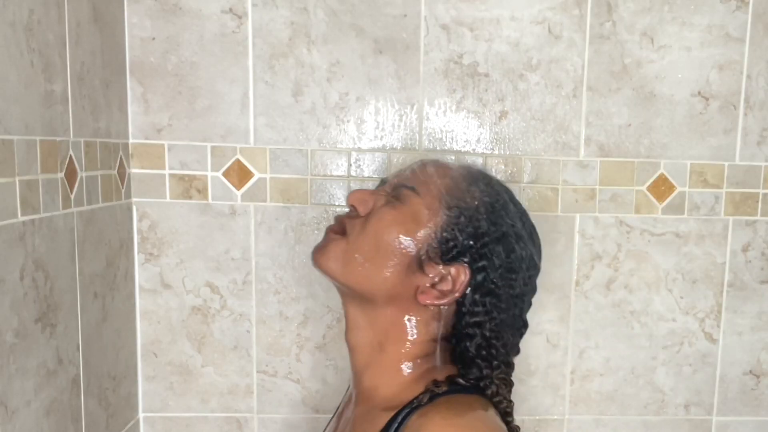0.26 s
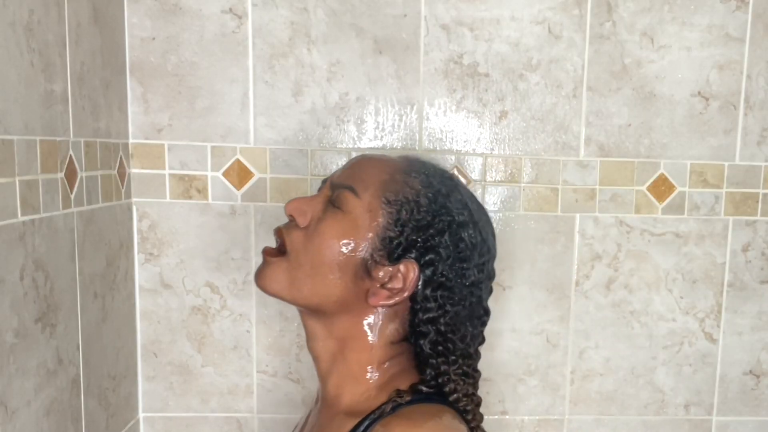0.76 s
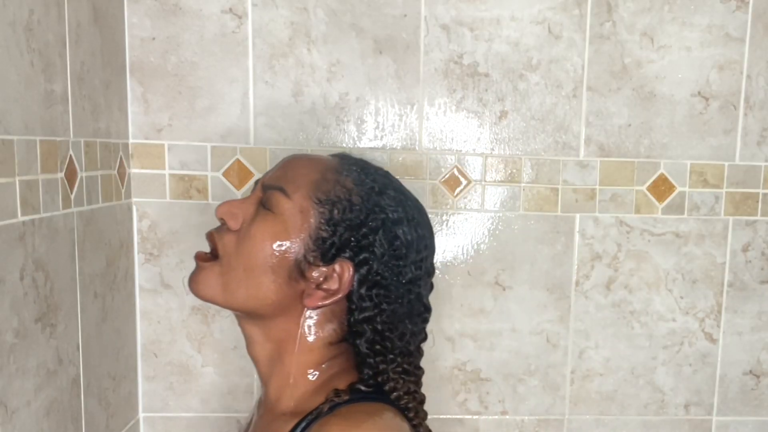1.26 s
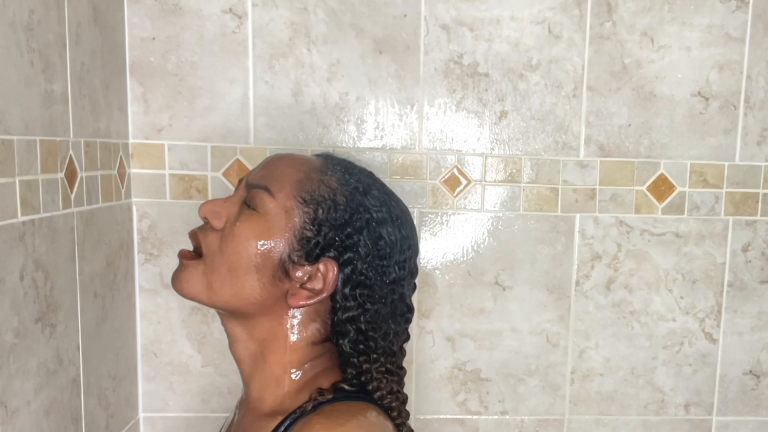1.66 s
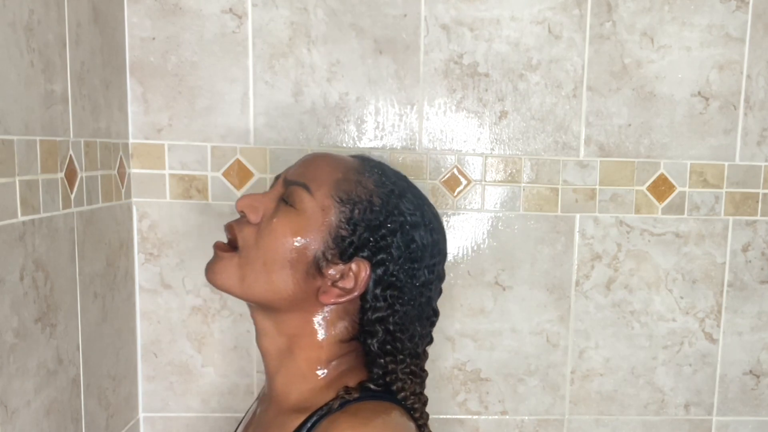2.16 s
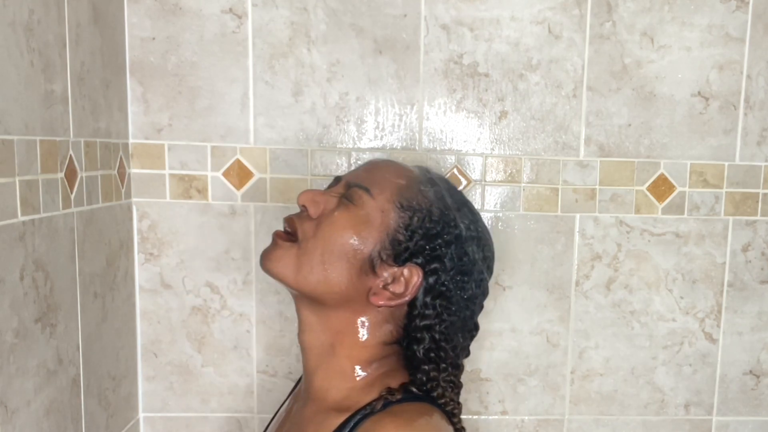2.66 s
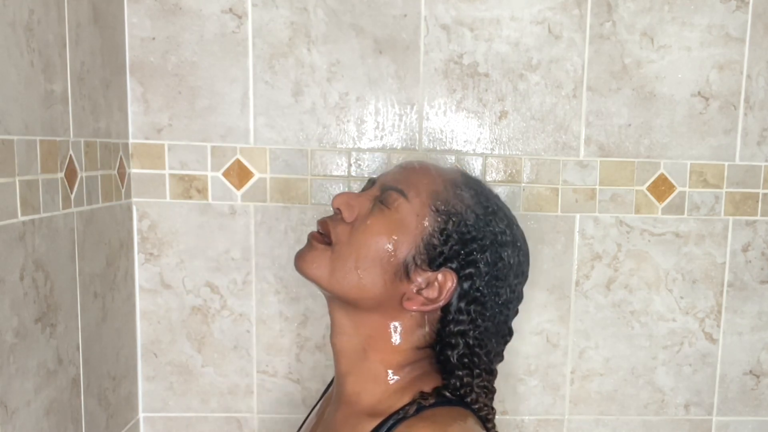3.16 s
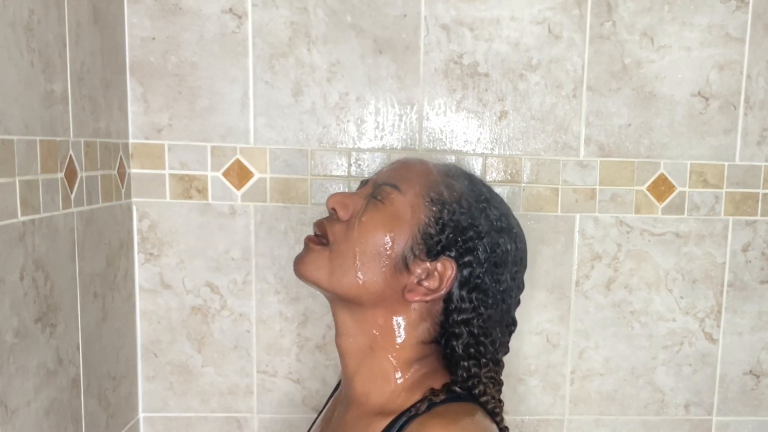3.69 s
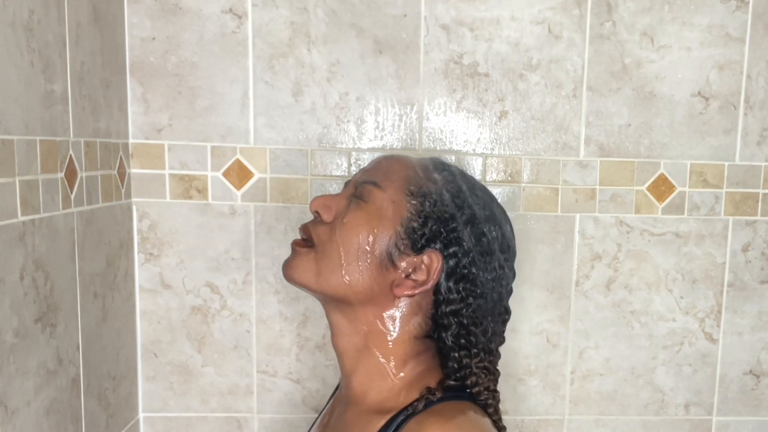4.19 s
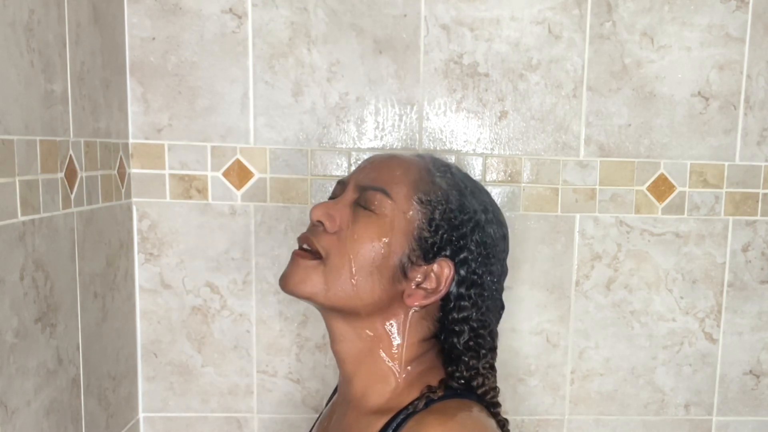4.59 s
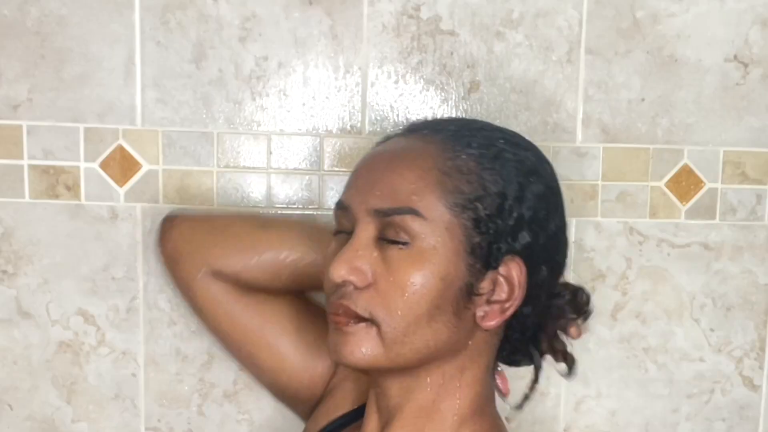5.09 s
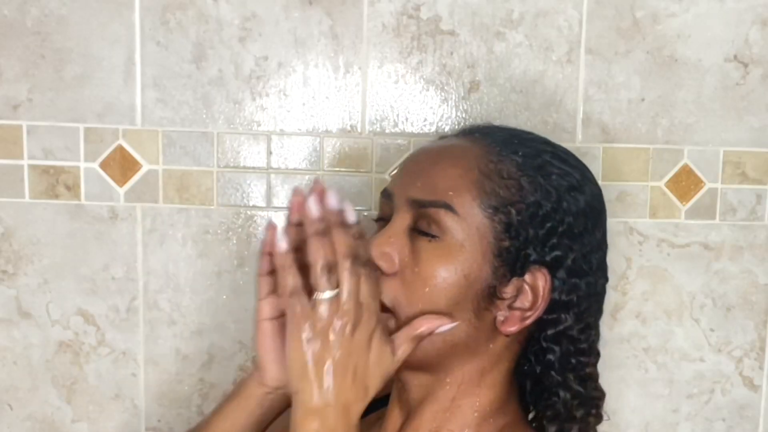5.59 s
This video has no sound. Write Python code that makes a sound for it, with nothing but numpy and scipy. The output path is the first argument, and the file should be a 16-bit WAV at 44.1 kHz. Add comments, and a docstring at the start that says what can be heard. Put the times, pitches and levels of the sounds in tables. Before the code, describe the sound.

A shower is already running at full flow, drumming on wet hair and skin in a small tiled stall. The sound is a dense stereo spray: low thumping, midrange patter and fine bright spatter, with short reflections from the tiles. A sharp splat cracks at 0.4 s, and heavier gushes pour off the hair around 0.65-1.5 s. Hollow glugs, small gurgles and ticking droplets continue, with bright slaps of water notably near 1.8, 2.3 and 4.4 s. The spray is fullest around 2-2.5 s, then eases back by 3.5 s. A faint, wavering, airy whistle comes from the nozzle. Two tiny bubbles chirp near 4.3 s. At about 5.1 s the water stops abruptly. Much quieter, wet palms rub over the face and hair in short strokes until the end near 6 s, with squelches and soft hollow pats around 5.2, 5.3, 5.55 and 5.7 s. A faint low hum and dull rumble remain throughout.

```python
"""A shower drums at once on a person's head in a tiled stall: surging noise bands made of random drops. Plops
gurgle and tick off the hair, glugs ring low, and lumps slap the floor as bright clicks with echo. The nozzle
sings faintly over it in narrow bands of noise. The scene changes abruptly from the spray to wet palms wiping
hair and face in strokes of drop noise, with soft pats. A low sine hum and a dull rumble lie under everything."""
import sys
import numpy as np
from scipy import signal
from scipy.fft import rfft, irfft, next_fast_len
from scipy.io import wavfile

SR = 44100
rng = np.random.default_rng(int(sys.argv[2]) if len(sys.argv) > 2 else 0)


def pcm_store(signal):
    """Save signal as 16-bit PCM."""
    levels = np.round(np.clip(np.atleast_2d(signal), -1, 1) * 32767)
    wavfile.write(sys.argv[1], SR, levels.astype(np.int16).T)


N = 257528
T = np.arange(N) / SR  # s
SIZE = next_fast_len(N, True)
HZ = np.fft.rfftfreq(SIZE, 1 / SR)

# the spray ends at STOP_S after a fade of FADE_S
STOP_S, FADE_S = 5.094, 0.044

# colours of the spray, from deep thumping to fine spatter: (frequency [Hz], level per Hz [dB])
DEEP_COLOUR = [(20, -18), (45, -14), (70, 0), (88, -4.5), (110, -10), (138, 9.5), (175, -13), (400, -51)]
DRUM_COLOUR = [(20, -32), (45, -21), (70, -14), (88, -25), (135, -4.5), (175, -5), (230, 0), (290, -11.5),
               (480, -8), (700, -12.5), (1500, -61.5)]
PATTER_COLOUR = [(200, -23), (480, -8), (680, -3.5), (1050, 1.5), (1500, -2.5), (2050, -2), (2600, -10),
                 (3500, -19), (6000, -15)]
SPATTER_COLOUR = [(1500, -36), (3000, -9.5), (4500, -8), (6500, -4), (8600, -3.5), (10000, -5.5),
                  (12000, -2), (14000, -2.5), (15700, -2.5)]
# how squarely the jet meets the head, which leans in and out again: (time [s], level [dB])
CONTACT = [(0, -5), (.7, -5), (1.25, -3), (1.9, -0.5), (2.5, -0.5), (3.1, -2), (3.5, -4.5), (4.08, -4.5),
           (4.3, -3.5), (5.05, -5)]
# water gathered in the hair pours off in heavy gushes: (middle [s], length [s], swell [dB])
GUSHES = [(0.02, 0.098, 3.5), (.21, 0.14, 1.5), (.42, 0.32, 2.5), (.65, 0.25, 7), (0.8, 0.27, 10),
          (1.03, 0.34, 4.5), (1.3, 0.36, 5.5), (1.525, 0.24, 4.5), (1.82, 0.17, 1.5), (2.19, 0.15, 3),
          (2.45, 0.27, 3), (2.82, 0.14, 1.5), (3.03, 0.39, 4.5), (4.4, 0.2, 2.5), (4.74, 0.2, -2)]
# the spatter swells in bright swishes: (middle [s], length [s], swell [dB])
SWISHES = [(.195, 0.2, 5), (1.36, 0.14, 2), (1.62, 0.3, 2), (1.74, 0.071, 1.5), (1.98, 0.058, 1)]
# each layer of the spray: (level at full contact [dB], gain per dB of contact [dB])
DRUMMING, THUMPING, PATTERING, SPATTERING = (-41.5, 0.81), (-48.5, 1.28), (-40, 0.49), (-36.5, 1.19)
THUMP_SWELL = 1.7  # dB of deep thumping gained per dB of a gush

# each layer of the run-off: (level at full contact [dB], gain per dB of contact [dB])
GURGLING, TICKING = (-48, 0.71), (-50, 0.5)
# hollow glugs: (start [s], length [s], peak level [dB], pitch [Hz])
GLUGS = [(0.005, 0.07, -40, 336), (0.785, 0.072, -38, 129.6), (0.792, 0.035, -36, 195),
         (1.48, 0.12, -33, 134.3), (1.505, 0.06, -40, 208), (1.82, 0.066, -42, 243),
         (2.395, 0.098, -36, 139), (2.465, 0.078, -37, 326), (2.505, 0.05, -44, 210),
         (3.055, 0.084, -43, 130), (4.29, 0.09, -45, 138), (4.535, 0.1, -41.5, 137), (4.7, 0.13, -42, 136)]
PLOP_RISE = 0.06  # share by which a plop starts below its pitch and ends above it

# lumps of water slapping down:
# (time [s], level [dB], centre [Hz], half-width [octaves], echo against the slap [dB])
SLAPS = [(0.4028, -11, 7160, 0.32, 0), (0.4053, -21.5, 3790, 0.2, 3), (0.409, -29, 2880, 0.16, 5),
         (0.419, -22.5, 5630, 0.27, 8.5), (0.786, -24, 9200, 0.4, 7), (0.8866, -18.5, 9600, 0.48, 8),
         (1.026, -20.5, 8300, .22, 8), (1.213, -29, 8400, 0.29, 10), (1.525, -21, 9600, 0.32, 5),
         (1.5854, -29, 8330, .3, 5), (1.8157, -15.5, 7300, 0.53, 8), (1.822, -20, 8000, .35, 6),
         (1.911, -28, 8000, .25, -3), (2.013, -19, 9300, 0.35, 8), (2.166, -29, 8200, .25, 9),
         (2.2905, -16.5, 8900, 0.41, 8), (2.441, -25, 9000, 0.3, 11), (2.538, -20, 7000, 0.52, 1),
         (2.595, -18.5, 8400, 0.35, 6), (2.648, -19.5, 7600, .3, 0), (2.831, -25, 9400, 0.16, 1),
         (3.1254, -24.5, 5630, 0.26, 4), (3.138, -33, 4680, 0.26, -1), (3.144, -31.5, 3080, .22, 5.5),
         (3.2282, -29, 8400, 0.27, 10), (3.383, -19, 9400, 0.36, 0), (3.769, -20.5, 8100, 0.32, 10),
         (3.782, -25, 8600, 0.44, 8), (4.152, -28.5, 8500, .3, 2), (4.401, -25, 8100, .2, 1),
         (4.408, -17.5, 10100, 0.54, 8.5), (4.529, -27.5, 8600, 0.3, 10), (4.747, -25, 8000, 0.5, 9),
         (4.9397, -26.5, 8400, 0.33, 9)]
# bubbles ringing in pooled water: (time [s], level [dB], starting pitch [Hz], 60 dB decay [s])
BUBBLES = [(0.012, -35, 1870, 0.026), (.089, -33, 2050, 0.018), (.135, -32, 2100, 0.023),
           (.376, -37.5, 1330, 0.032), (4.317, -33, 3120, .025), (4.323, -28.5, 3200, 0.028)]
# the pitch rise is a share of the starting pitch
BUBBLE_RISE_PER_S, BUBBLE_ECHO_DB, BUBBLE_ATTACK_S = 2.4, 1, 0.0012

# the nozzle's main tone, and how much it wavers
SING_HZ, SING_WIDTH_HZ, SING_DB, WAVER_DB = 3285, 34, -56, 2.5
# swell of the main tone: (time [s], swell [dB])
SING_SWELL = [(0, 8), (.22, -3), (.35, 13), (.5, -2), (1.08, 1), (1.26, 5), (1.4, 1), (1.54, 6.5),
              (1.7, -1), (2.08, 1), (2.35, -9), (2.55, 9.5), (2.72, 7), (2.85, -3), (3.2, -8), (3.45, 5),
              (3.62, 0.5), (3.93, 3), (4.22, -1), (4.65, 0), (5.0, 2)]
# further tones of the nozzle: (frequency [Hz], width [Hz], level [dB])
OTHER_TONES = [(2202, 25, -62), (3325, 130, -60), (5771, 130, -63), (6514, 35, -60.5), (6901, 70, -60),
               (7420, 120, -54.5), (9480, 110, -59.5), (10020, 90, -53.5), (10550, 110, -61.5)]

# strokes of the wet palms: (start [s], time to fall by WIPE_FADE_DB [s], level before WIPE_LIFT_DB [dB])
WIPES = [(5.103, 0.19, -61.5), (5.255, .1, -66), (5.33, 0.11, -58), (5.422, 0.066, -71), (5.555, 0.18, -61),
         (5.618, 0.083, -67), (5.7, .09, -65), (5.8, 0.13, -64.5)]
WIPE_RISE_S, WIPE_FADE_DB, WIPE_LIFT_DB = 0.025, -18.5, 2.5
# colours of the wiping and of a pat's splash: (frequency [Hz], level per Hz [dB])
WIPE_COLOUR = [(150, -17.5), (420, 2), (800, 4.5), (1500, 2), (2600, -1.5), (5000, -7.5), (10000, -13.5),
               (15000, -16)]
SPLASH_COLOUR = [(300, 1), (1200, -14), (2600, 1), (5000, -5), (9000, -10), (15000, -17)]
# wet pats and drips, before the stall resonances colour them:
# (time [s], thud level [dB], thud pitch [Hz], splash against the thud [dB])
PATS = [(5.117, -57, 720, -21), (5.188, -50, 770, -16), (5.312, -50.5, 800, -8), (5.345, -54, 900, 7),
        (5.534, -61, 710, -19), (5.562, -51, 790, 0), (5.71, -51, 820, -4), (5.811, -55, 784, 2)]
# stall resonances that colour the hand sounds: (frequency [Hz], width [Hz], lift or dip [dB])
HAND_MODES = [(453.5, 9.1, 12), (670, 26, 7), (774, 35, 6.5), (920, 32, 7.5), (1420, 45, -2)]
# skin rubbing and water squeezed from under the palms:
# (start [s], length [s], level [dB], frequency [Hz], width [Hz])
SQUELCHES = [(5.178, 0.15, -66, 210, 162), (5.198, 0.19, -70, 2730, 650), (5.232, 0.12, -61.5, 1425, 100),
             (5.25, .08, -63, 1040, 80), (5.291, 0.16, -66, 450, 45), (5.33, 0.12, -60, 1050, 180),
             (5.332, 0.06, -60, 765, 40), (5.335, 0.084, -61, 2480, 650), (5.34, 0.063, -65, 1440, 120),
             (5.554, 0.065, -57, 825, 70), (5.573, 0.065, -61, 358, 50), (5.58, 0.15, -64.5, 220, 170),
             (5.555, 0.23, -73, 10000, 6000), (5.62, 0.11, -69, 4930, 1090),
             (5.76, 0.065, -69.5, 4100, 795)]

# colour of the room's rumble: (frequency [Hz], level per Hz [dB])
RUMBLE_COLOUR = [(20, -27.5), (45, -5), (68, -0.5), (90, -13), (150, -13), (280, -19), (1000, -35),
                 (8000, -47)]
HUM_HZ = 69.5

# standing waves of the stall: (frequency [Hz], width [Hz], lift [dB])
STALL_MODES = [(102, 14, 9), (141.9, 8.9, 6.5), (196, 21.5, 4), (324.3, 8.6, 11), (359.6, 14.4, 12.5),
               (467.3, 20, 9), (559, 19, 6), (636, 8.1, 5), (686, 11, 6), (772, 16, 7), (993, 17, 2.5),
               (1220, 15.6, 5.5), (1445, 25, 6.5)]
# how long the tiles ring: (frequency [Hz], 60 dB decay [s])
TILE_DECAY = [(100, 0.16), (500, 0.35), (1500, 0.28), (4000, 0.35), (9000, 0.26), (16000, 0.047)]
# likeness of the echo in both ears: (frequency [Hz], likeness [0-1])
EAR_LIKENESS = [(60, 0.63), (140, 0.95), (290, 0.55), (450, 0.42), (650, 0), (16000, 0.0084)]
# treble that both sides have in common: (frequency [Hz], share [0-1])
SHARED_TREBLE = [(6000, 0), (6800, .6), (8000, .92), (16000, .9)]
TREBLE_LAG_S, EDGE_HZ = 0.000246, 15850  # the edge is the top of the sound's band


def spray():
    """The jet drums on the head, patters on skin and tile, and bursts into fine spatter; all follow its contact."""
    contact = np.interp(T, *np.transpose(CONTACT))
    gush = arches(GUSHES)
    drum = tint(drops(per_s=1000, spread_db=2, surge_db=2.0, echo_db=16.0), read(DRUM_COLOUR, HZ))
    deep = tint(drops(per_s=410, spread_db=0.5, surge_db=2.5, echo_db=9.0, count=5), read(DEEP_COLOUR, HZ))
    patter = tint(drops(per_s=1300, spread_db=3.0, surge_db=1.7, echo_db=12.0, count=9),
                  read(PATTER_COLOUR, HZ))
    spatter = tint(drops(per_s=1900, spread_db=4.0, surge_db=1.5, echo_db=12.0, count=6),
                   read(SPATTER_COLOUR, HZ))
    layers = [(drum, DRUMMING, 0.5 * gush + 0.34 * wander(count=90)),
              (deep, THUMPING, THUMP_SWELL * gush),
              (patter, PATTERING, 0.04 * gush),
              (spatter, SPATTERING, arches(SWISHES) + 0.17 * wander(count=110))]
    return sum(sound * gain_of(db + slope * contact + surge) for sound, (db, slope), surge in layers)


def runoff():
    """Water leaving the hair gurgles, sheds droplets that each tick at their own pitch, and now and then glugs."""
    gurgle = plops(count=260, low_hz=161.4, high_hz=1098, cycles=12.4, spread_db=10, echo_db=-3.5)
    droplets = plops(count=800, low_hz=2305, high_hz=6840, cycles=8.5, spread_db=14.5, echo_db=3.5)
    contact = np.interp(T, *np.transpose(CONTACT))
    layers = [(gurgle, GURGLING), (droplets, TICKING)]
    out = sum(sound * gain_of(db + slope * contact) for sound, (db, slope) in layers)
    for s, length, db, hz in GLUGS:
        add(out, s, gain_of(db) * plop(hz, length)[None])
    return out


def splashes():
    """Run-off slaps down in bright cracks, and a trapped bubble now and then rings with rising pitch."""
    out = np.zeros((2, N))
    for s, db, hz, octaves, echo_db in SLAPS:
        slap = np.convolve(breakup(), click(hump(hz, octaves)))
        add(out, s, gain_of(db) * echoed(slap, echo_db))
    t = np.arange(SR // 10) / SR
    for s, db, hz, t60 in BUBBLES:
        tone = np.sin(2 * np.pi * hz * t * (1 + BUBBLE_RISE_PER_S * t / 2))
        envelope = gain_of(db - 60 * t / t60) * np.minimum(t / BUBBLE_ATTACK_S, 1)
        add(out, s, echoed(tone * envelope, BUBBLE_ECHO_DB))
    return out


def nozzle():
    """Turbulence in the shower head sings in one main tone and others that swell and sink."""
    main_db = SING_DB + np.interp(T, *np.transpose(SING_SWELL)) + WAVER_DB * wander(count=60)
    out = gain_of(main_db) * fuzzy(SING_HZ, SING_WIDTH_HZ)
    for hz, width, db in OTHER_TONES:
        out += gain_of(db + 1.8 * wander(count=30)) * fuzzy(hz, width)
    return out


def hands():
    """Wet palms slide over hair and face and squelch; each pat is a hollow thud with a little splash."""
    rubbing = tint(drops(per_s=2600, spread_db=3.5, surge_db=2.0, echo_db=12), read(WIPE_COLOUR, HZ))
    out = gain_of(WIPE_LIFT_DB) * strokes() * rubbing
    splash = click(lambda hz: read(SPLASH_COLOUR, hz))
    for s, db, hz, splash_db in PATS:
        thud = click(hump(hz, octaves=0.72))
        add(out, s, gain_of(db) * echoed(thud + gain_of(splash_db) * splash, echo_db=8.0))
    out = irfft(rfft(out, SIZE) * lifted(HAND_MODES, HZ), SIZE)[:, :N]
    for s, length, db, hz, width in SQUELCHES:
        out += gain_of(db) * fuzzy(hz, width) * bulge((T - s) / length)
    return out


def hum():
    """A faint low machine hum, a steady sine, in the room's rumble of partly shared stereo noise."""
    noise = rng.standard_normal(N) + 0.81 * rng.standard_normal((2, N))
    rumble = tint(noise, read(RUMBLE_COLOUR, HZ))
    return gain_of(-71.0) * rumble + gain_of(-78.5) * np.sin(2 * np.pi * HUM_HZ * T)


def drops(per_s, spread_db, surge_db, echo_db, count=7):
    """Drops of random size land on count spots, on each in small surges; the echo is full from the start."""
    out = np.zeros((2, N))
    for _ in range(count):
        sizes_db = spread_db * np.minimum(rng.exponential(1, N), 5) + surge_db * wander(count=260)
        landings = rng.choice([-1, 1], N) * (rng.random(N) < per_s / count / SR)
        sound = echoed(gain_of(sizes_db) * landings, echo_db)
        add(out, 0, sound)
        add(out, 0, sound[:, N:])  # the echo past the end fills in the start
    return out


def plops(count, low_hz, high_hz, cycles, spread_db, echo_db):
    """Plops at random moments, each with its own pitch, most of them small; rms 1."""
    dry = np.zeros((1, N))
    for when, pitch, size in rng.random((count, 3)):
        hz = low_hz * (high_hz / low_hz) ** pitch
        add(dry, when * T[-1], gain_of(spread_db * size ** 2) * plop(hz, cycles / hz)[None])
    return evened(echoed(dry[0], echo_db)[:, :N])


def plop(hz, length):
    """A pocket of air rings under the water, rising a little in pitch."""
    u = np.arange(0, length, 1 / SR) / length
    return bulge(u) * np.sin(2 * np.pi * hz * length * u * (1 + PLOP_RISE * (u - 1)))


def breakup(size=1400):
    """A lump lands whole, then its fragments hit over a few hundredths of a second."""
    t = np.arange(size) / SR
    landings = rng.random(size) < 450 / SR  # 450 fragments per s
    hits = gain_of(-9) * rng.uniform(-1, 1, size) * landings * np.exp(-t / 0.012)
    hits[0] = 1
    return hits


def fuzzy(hz, width):
    """Stereo turbulence in one resonance; rms 1."""
    return tint(rng.standard_normal((2, N)), -20 * np.log10(1 + 2 * ((HZ - hz) / width) ** 2))


def strokes():
    """How hard the palms rub: each stroke rises quickly and dies away."""
    out = np.zeros(N)
    for s, length, db in WIPES:
        rise = np.clip((T - s) / WIPE_RISE_S, 0, 1)
        out += rise * gain_of(db + WIPE_FADE_DB * np.maximum(T - s, 0) / length)
    return out


def arches(table):
    """A swell in dB: each row is one smooth arch."""
    return sum(db * np.cos(np.pi * np.clip((T - s) / length, -0.5, 0.5)) ** 2 for s, length, db in table)


def bulge(u):
    """A soft envelope over u = 0..1 that rises faster than it falls."""
    return np.sin(np.pi * np.clip(u, 0, 1) ** 0.7) ** 2


def wander(count):
    """Slow chance: count random values joined by lines over the whole time; rms 1."""
    return evened(np.interp(T, np.linspace(0, T[-1], count), rng.standard_normal(count)))


def click(db_at, size=2048):
    """The sharpest causal (minimum-phase) click with a given spectrum; peak 1."""
    hz = abs(np.fft.fftfreq(size, 1 / SR))
    log_gain = np.log(gain_of(np.maximum(db_at(hz), -70)))
    x = np.fft.ifft(np.exp(np.conj(signal.hilbert(log_gain)))).real
    return x / abs(x).max()


def hump(centre_hz, octaves):
    """A band-pass slope in dB, as a function of frequency; 3 dB down at octaves either side."""
    return lambda hz: -10 * np.log10(1 + (np.log2((hz + 1) / centre_hz) / octaves) ** 4)


def echoed(x, echo_db):
    """A sound followed by its echo off the tiles."""
    response = gain_of(echo_db) * stall()
    response[:, 0] += 1
    return signal.fftconvolve(x[None], response, axes=1)


def stall(size=16384):
    """Stereo echo of the stall from one spot: dense reflections, standing waves, bass alike in both ears."""
    hz, t, z = signal.stft(rng.standard_normal((2, size)), SR, nperseg=256)
    decay = gain_of(-60 * t / read(TILE_DECAY, hz)[:, None])
    tail = signal.istft(z * decay, SR, nperseg=256)[1][:, :size]
    hz = np.fft.rfftfreq(size, 1 / SR)
    left, other = rfft(tail)
    alike = np.clip(read(EAR_LIKENESS, hz), -1, 1)
    pair = np.array([left, alike * left + np.sqrt(1 - alike ** 2) * other])
    tail = irfft(pair * lifted(STALL_MODES, hz))
    return tail / np.linalg.norm(tail[0])


def lifted(modes, hz):
    """Complex gain of resonances that each lift or dip their own narrow band."""
    return np.prod([1 + (gain_of(db) - 1) / (1 + 2j * (hz - f) / width) for f, width, db in modes], axis=0)


def tint(x, db):
    """Colours a full-length sound; rms 1."""
    return evened(irfft(rfft(x, SIZE) * gain_of(db), SIZE)[..., :N])


def read(points, hz):
    """Reads a spectrum on a log-frequency axis."""
    f, value = np.transpose(points)
    return np.interp(np.log(hz + 1), np.log(f + 1), value)


def evened(x):
    """Scales to rms 1."""
    return x / np.sqrt(np.mean(x ** 2) + 1e-20)


def gain_of(db):
    """Decibels to amplitude."""
    return 10 ** (np.asarray(db) / 20)


def add(mix, s, sound):
    """Mixes a sound in at s seconds, cut off at the end of the mix."""
    part = mix[:, round(s * SR):][:, :sound.shape[1]]
    part += sound[:, :part.shape[1]]


def scene():
    """The running shower, then the wiping hands, with the hum throughout."""
    running = np.clip((STOP_S - T) / FADE_S, 0, 1)
    shower = spray() + runoff() + nozzle() + splashes()
    return running * shower + (T > STOP_S) * hands() + hum()


def record(dry):
    """Shared treble reaches the left side a moment after the right; then a steep low-pass limits the band."""
    left, right = rfft(dry, SIZE)
    common = read(SHARED_TREBLE, HZ)
    late_right = right * np.exp(-2j * np.pi * HZ * TREBLE_LAG_S)
    left = common * late_right + np.sqrt(1 - common ** 2) * left
    pair = irfft(np.array([left, right]), SIZE)[:, :N]
    low_pass = signal.firwin(511, EDGE_HZ, window=("kaiser", 9), fs=SR)
    return signal.oaconvolve(pair, low_pass[None], "same")


dry = scene()
out = record(dry)
pcm_store(out)
```